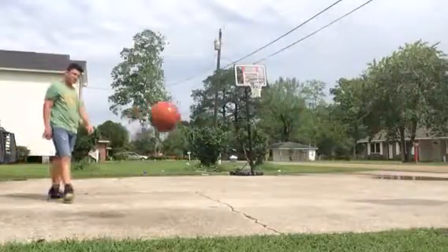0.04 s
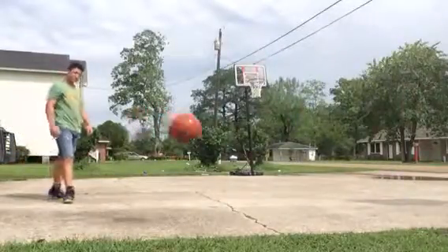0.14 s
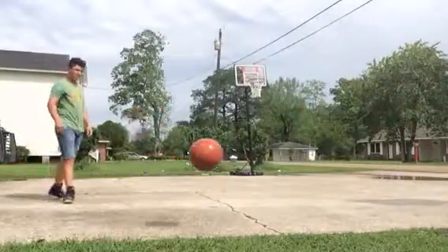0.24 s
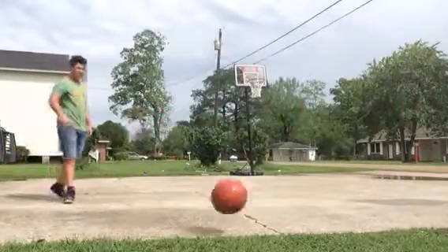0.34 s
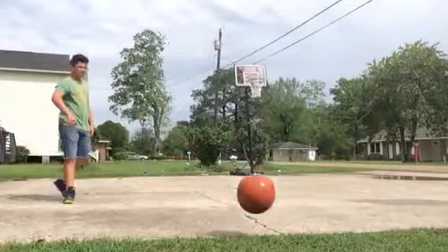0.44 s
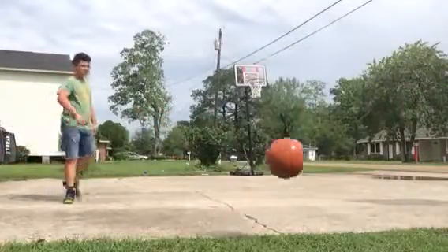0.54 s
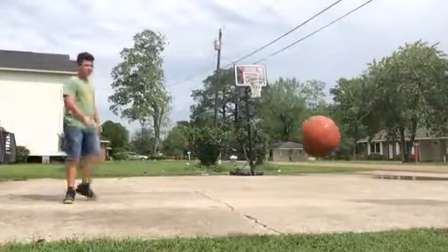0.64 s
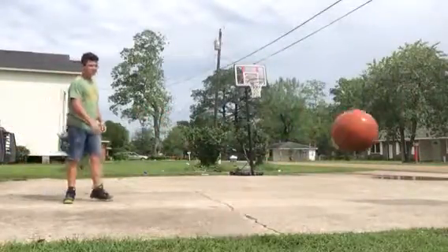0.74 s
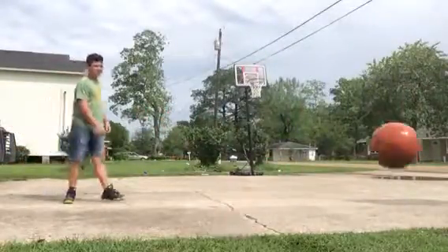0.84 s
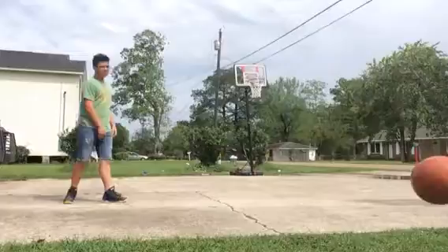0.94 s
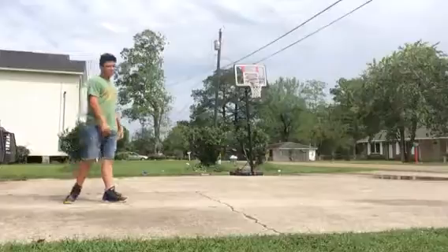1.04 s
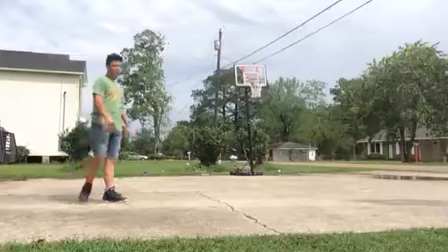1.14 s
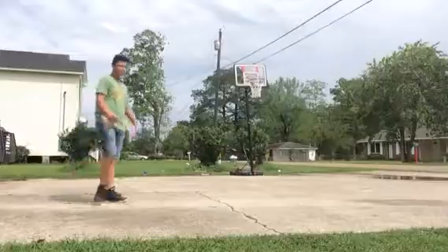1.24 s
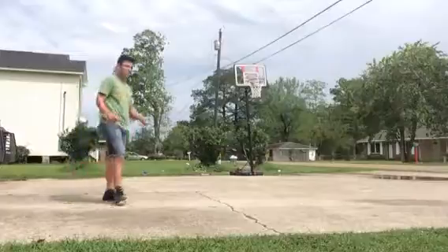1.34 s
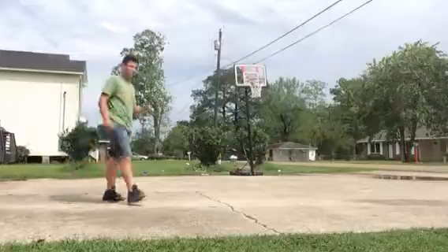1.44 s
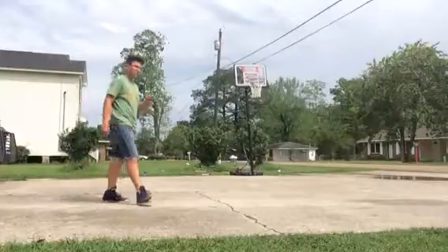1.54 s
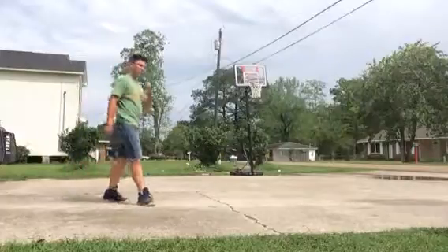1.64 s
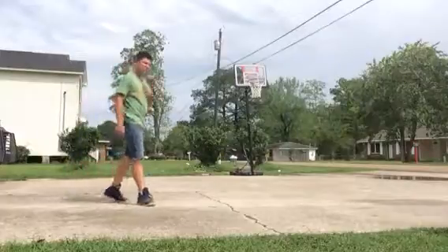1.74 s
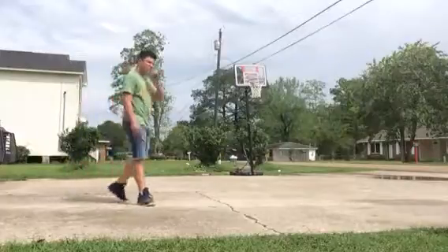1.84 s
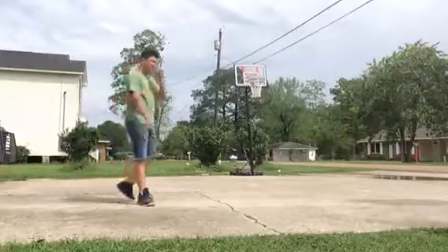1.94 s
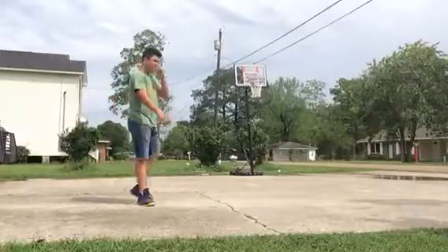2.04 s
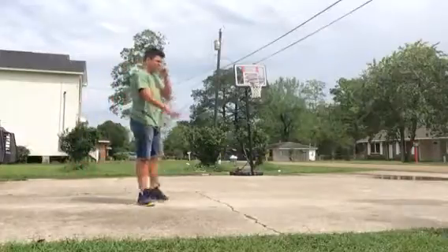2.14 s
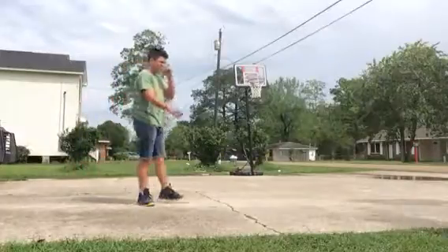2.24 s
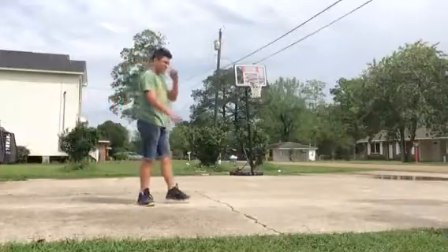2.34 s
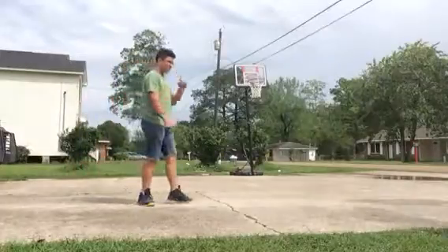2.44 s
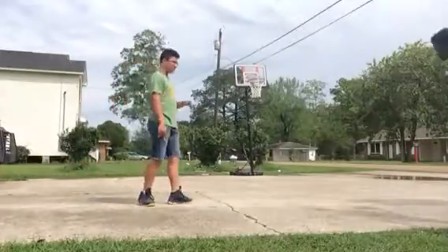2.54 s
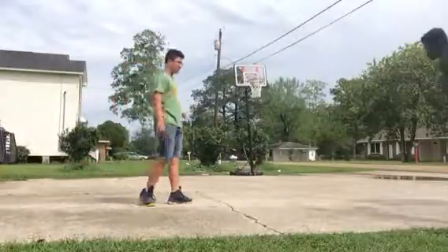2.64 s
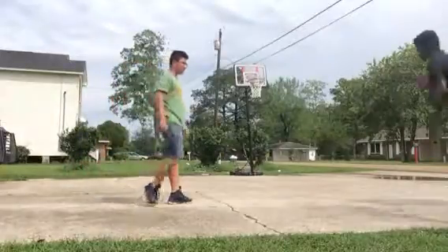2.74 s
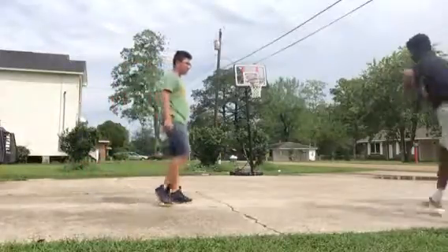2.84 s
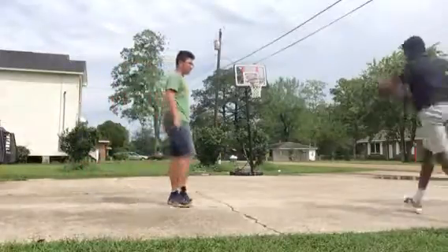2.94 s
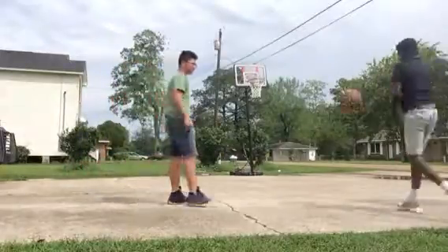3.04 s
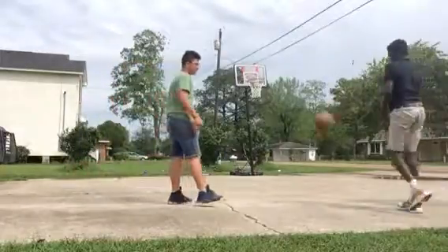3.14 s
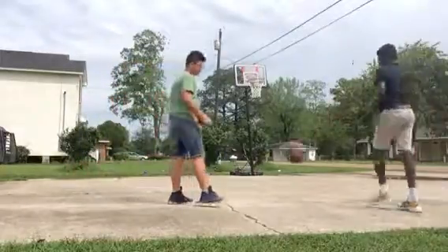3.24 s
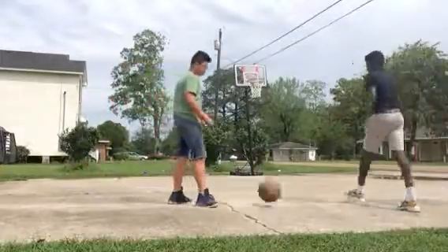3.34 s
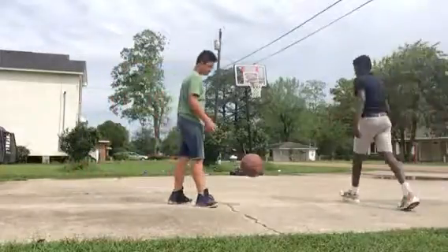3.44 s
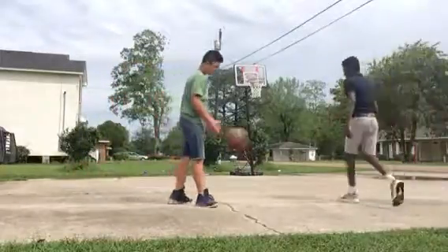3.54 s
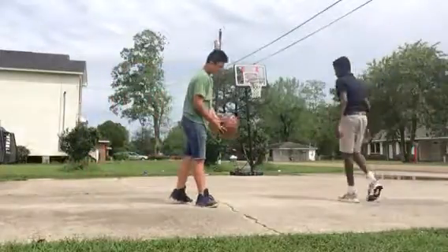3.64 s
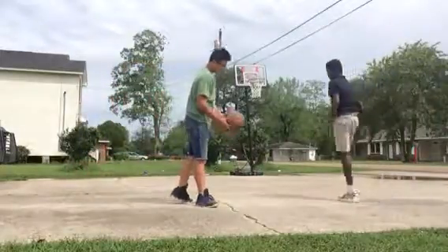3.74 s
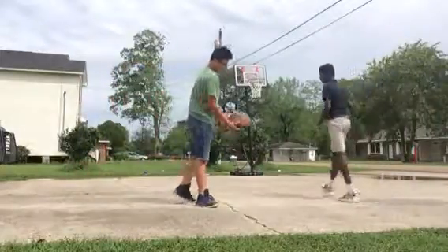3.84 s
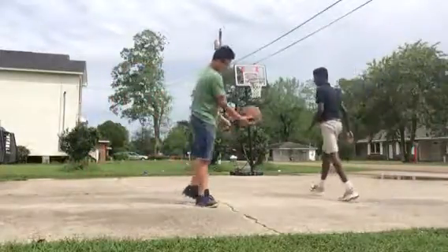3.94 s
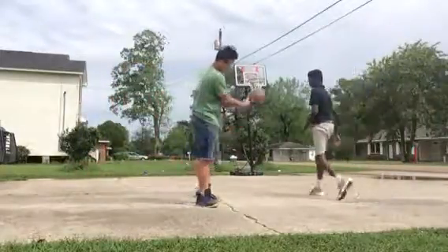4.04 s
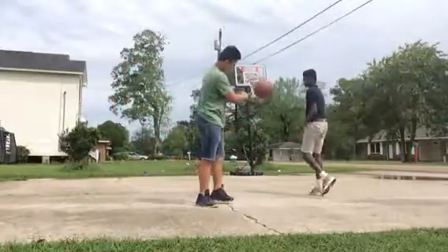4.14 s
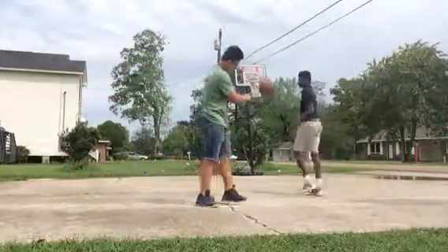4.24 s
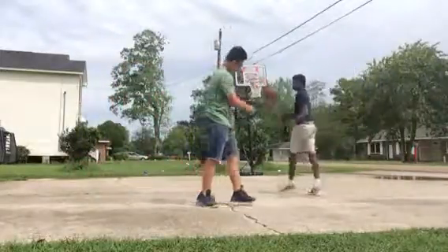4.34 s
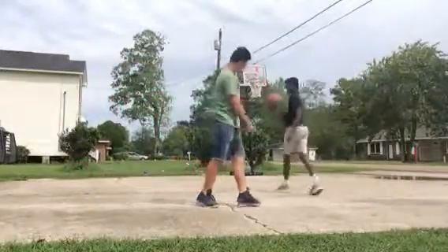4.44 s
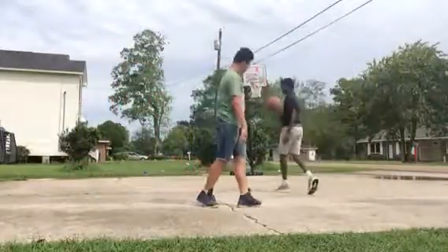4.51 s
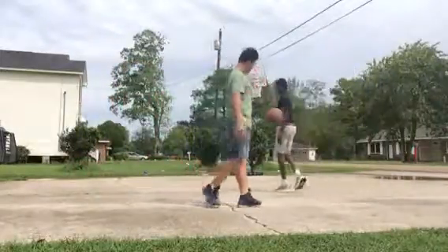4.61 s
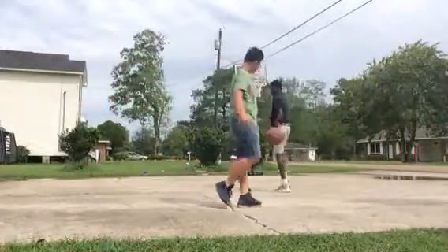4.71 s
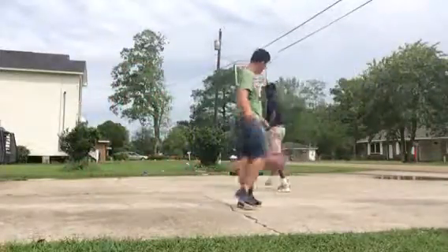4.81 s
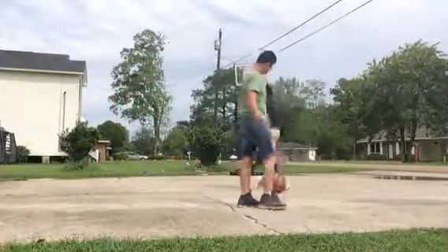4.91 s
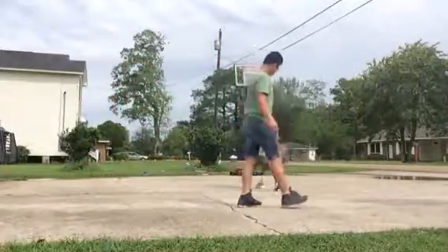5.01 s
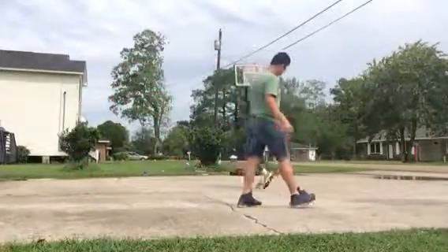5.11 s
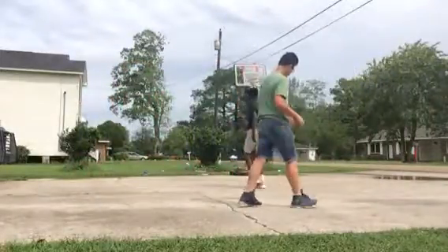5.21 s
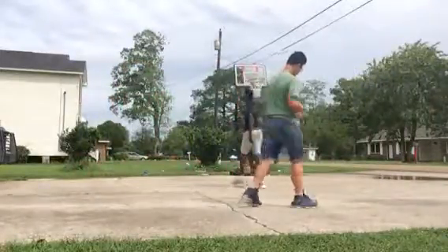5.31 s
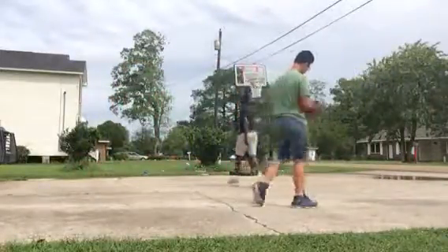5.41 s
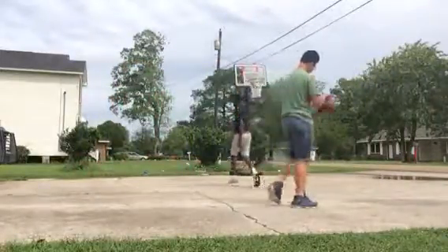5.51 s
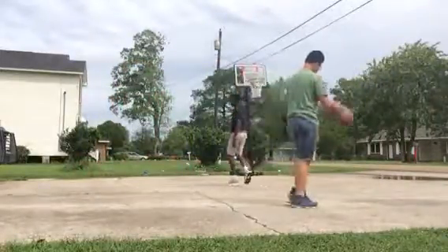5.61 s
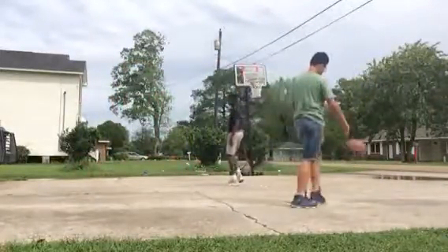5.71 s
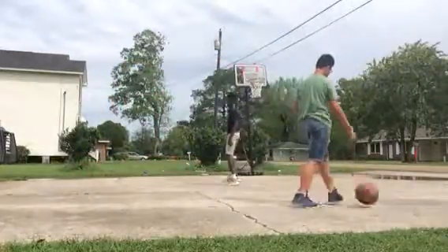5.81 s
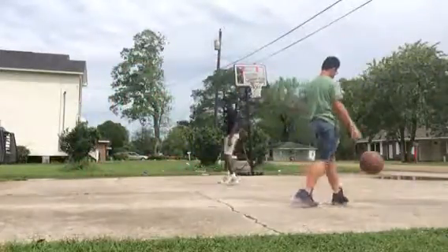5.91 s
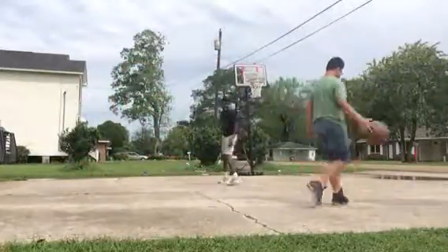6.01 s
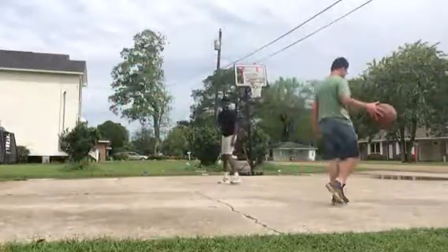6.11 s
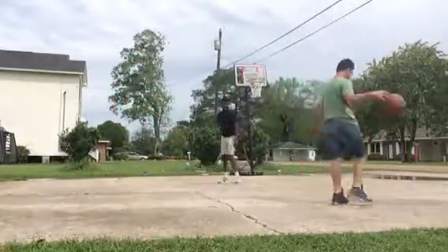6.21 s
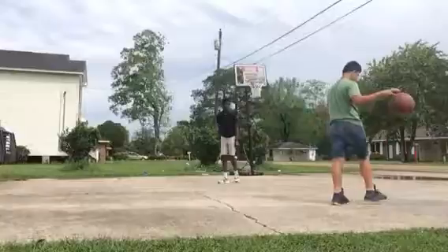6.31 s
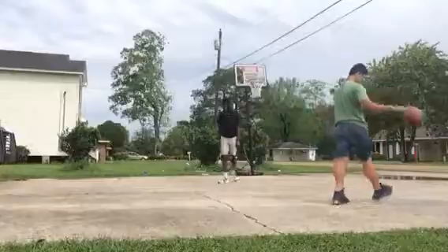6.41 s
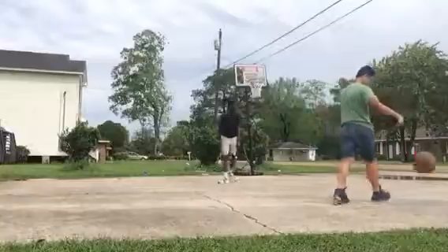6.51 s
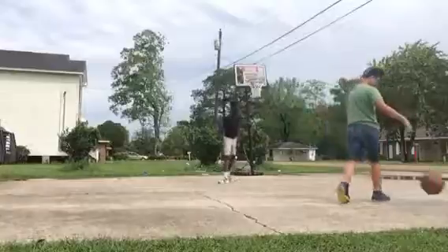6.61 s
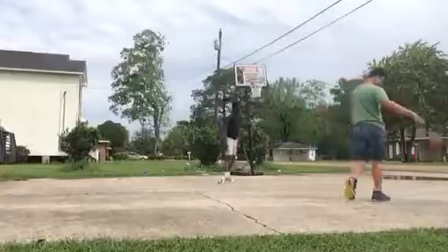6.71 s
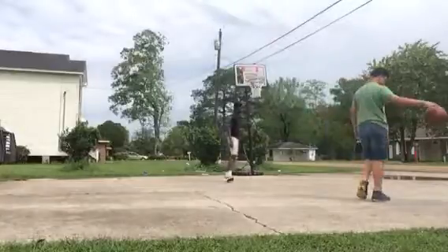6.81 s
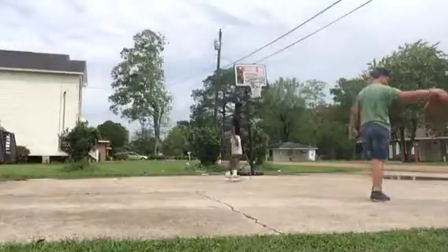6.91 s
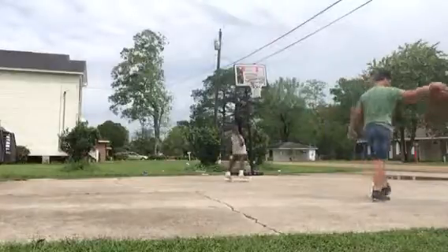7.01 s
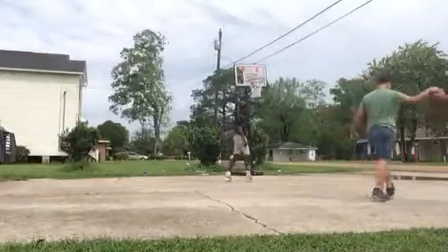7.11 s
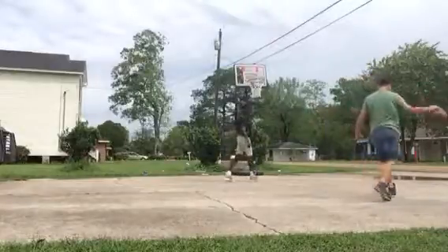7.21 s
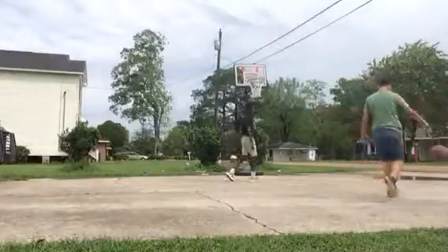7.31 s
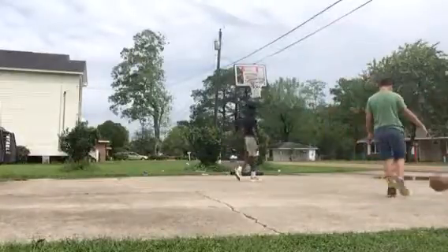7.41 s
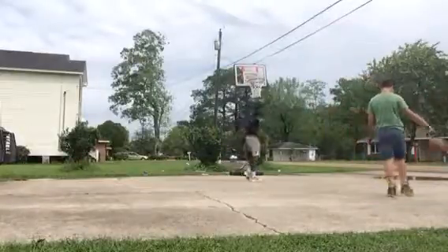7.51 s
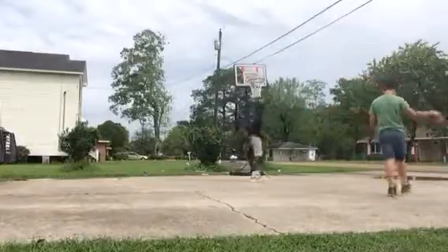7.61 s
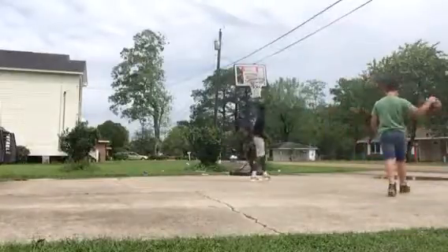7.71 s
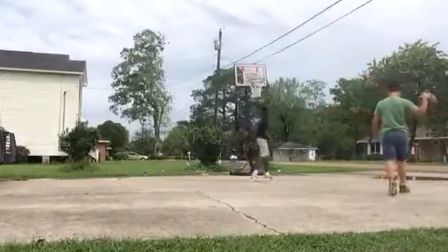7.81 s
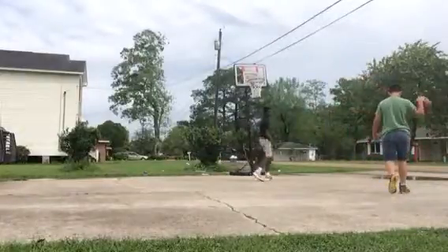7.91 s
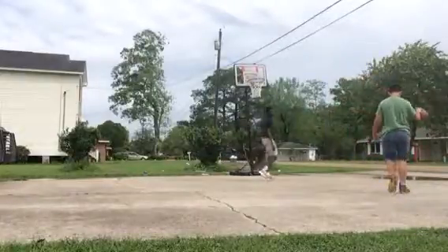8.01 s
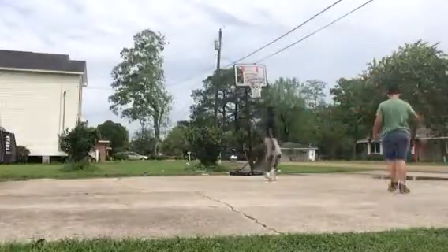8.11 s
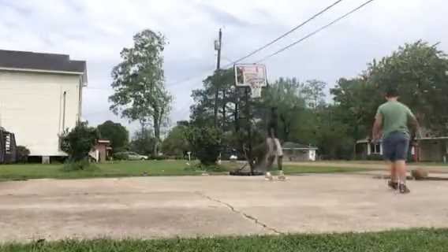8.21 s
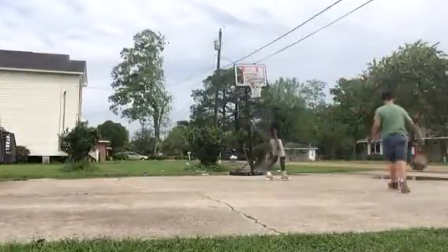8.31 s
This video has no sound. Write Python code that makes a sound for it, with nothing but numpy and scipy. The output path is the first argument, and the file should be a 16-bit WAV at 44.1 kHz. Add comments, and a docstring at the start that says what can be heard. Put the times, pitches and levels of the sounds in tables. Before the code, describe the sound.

Single ball bounces, then a steady slow dribble on a hard open court, with shoes scuffing sand, birds chirping and distant rumble behind.

```python
"""Two basketballs are bounced, caught and dribbled on outdoor concrete while two players shuffle about.
Each blow is a low push of air, a wobble of the shell, a slap and the ping of the air inside.
A near wall and a far house answer; shoes crunch and drag on loose sand, and a sole squeaks once.
Small birds whistle and chip in the trees over a low, distant hum, a rustle and microphone hiss.
Solids are damped modes and dying noise, birds are gliding sines, and the background is coloured noise."""
import sys
import numpy as np
from scipy import signal
from scipy.fft import rfft, irfft, next_fast_len
from scipy.io import wavfile
from scipy.ndimage import map_coordinates

SR = 44100
rng = np.random.default_rng(int(sys.argv[2]) if len(sys.argv) > 2 else 0)


def dump(signal):
    """Clip the signal to [-1, 1] and save it as 16-bit WAV at the path in sys.argv[1]."""
    limited = np.clip(np.atleast_2d(signal).T, -1, 1)
    pcm = np.round(limited * 32767).astype(np.int16)
    wavfile.write(sys.argv[1], SR, pcm)


N = 368235  # samples

# sand crushed on concrete or dust on a palm: (frequency [Hz], relative level [dB])
GRIT_SPECTRUM = [(300, 21.5), (1200, 4), (2500, 9), (4500, 0.5), (6800, 8), (9500, 1.5), (15000, -4)]
# sand under a sole: (frequency [Hz], relative level [dB])
CRUNCH_SPECTRUM = [(300, -18), (1200, 0), (2600, 5.5), (4000, 8), (5500, 8.5), (8000, 0), (15000, -4.5)]
WALL_DELAY_S = 0.011  # near wall, from mid-court


def amp(db):
    """Decibels to gain."""
    return 10 ** (np.asarray(db) / 20)


def unit(x):
    """Scale to rms 1."""
    return x / np.sqrt(np.mean(x ** 2) + 1e-20)


def along(points, hz):
    """Interpolate (Hz, value) points on a log frequency axis."""
    f, v = np.transpose(points)
    return np.interp(np.log(hz + 1), np.log(f + 1), v)


def filtered(x, response):
    """Multiply the spectrum of x by a function of frequency."""
    m = next_fast_len(len(x) + 8192)
    hz = np.fft.rfftfreq(m, 1 / SR)
    return irfft(rfft(x, m) * response(hz), m)[:len(x)]


def equalized(x, points):
    """Filter x by a (Hz, dB) curve."""
    return filtered(x, lambda hz: amp(along(points, hz)))


def noise(spectrum, size, shift=1):
    """Coloured noise of rms 1, its spectrum scaled in frequency by shift."""
    white = rng.standard_normal(size)
    return unit(filtered(white, lambda hz: amp(along(spectrum, hz / shift))))


def fade(t, t60):
    """Exponential decay, 60 dB in t60 seconds."""
    return np.exp(-np.log(1000) * t / t60)


def burst(spectrum, t, t60, shift=1):
    """Dying noise whose energy is set by its decay alone."""
    shape = fade(t, t60)
    return unit(noise(spectrum, len(t), shift) * shape) * np.sqrt(np.mean(shape ** 2))


def ring(modes, t, scatter_db, detune, tilt_db=0):
    """Damped modes, struck a little differently each time; tilt (dB an octave) favours the upper ones."""
    centre_hz = np.mean([hz for hz, _, _ in modes])
    out = np.zeros(len(t))
    for hz, db, t60 in modes:
        gain = amp(db + tilt_db * np.log2(hz / centre_hz) + scatter_db * rng.normal())
        mode_hz = hz * (1 + detune * rng.normal())
        out += gain * fade(t, t60) * np.sin(2 * np.pi * mode_hz * t)
    return out


def wobble(rate, size):
    """A smooth random curve, rate knots a second."""
    knots = rng.standard_normal(int(size * rate / SR) + 4)
    return map_coordinates(knots, [np.arange(size) * rate / SR])


def lobe(t, length):
    """Half a sine wave that starts at t = 0."""
    return np.sin(np.pi * np.clip(t / length, 0, 1))


def add(track, s, x):
    """Mix x into the track at time s."""
    part = track[max(round(s * SR), 0):][:len(x)]
    part += x[:len(part)]


def chirp(length, start_hz, end_hz):
    """A gliding whistle that flutters in pitch and strength; its last 7 % is silent."""
    u = np.linspace(0, 1, int(length * SR))
    pitch_hz = (start_hz + (end_hz - start_hz) * u) * (1 + 0.0098 * wobble(252.4, len(u)))
    flutter = unit(amp(5.4 * wobble(76.6, len(u))))
    envelope = np.abs(lobe(u, 0.93)) ** 0.28
    return flutter * envelope * np.sin(2 * np.pi * np.cumsum(pitch_hz) / SR)


def crackle(size, rate, spread_db):
    """Separate sand grains snapping, rate a second, of uneven size; rms 1."""
    hits = rng.random(size) < rate / SR
    sizes = amp(spread_db * rng.standard_normal(size))
    return unit(equalized(hits * rng.choice([-1, 1], size) * sizes, CRUNCH_SPECTRUM))


def scattered(x, decay):
    """x through a fresh diffuse tail with (Hz, t60 s) decay; scatter returns in uneven clumps."""
    patchy_db, patches_per_s = 2, 120
    hz, t, z = signal.stft(rng.standard_normal(SR), SR, nperseg=256)
    tail = signal.istft(z * fade(t, along(decay, hz)[:, None]), SR, nperseg=256)[1]
    tail *= amp(patchy_db * wobble(patches_per_s, len(tail)))
    return signal.fftconvolve(x, tail / np.linalg.norm(tail))[:len(x)]


def court(x, wall_s):
    """Direct sound, the near wall's copy, scatter from the yard and trees, and the house's dull echo."""
    # scatter of the yard: (frequency [Hz], t60 [s])
    yard_decay = [(100, 0.19), (400, 0.086), (1400, 0.13), (4000, 0.17), (12000, 0.094)]
    out = x.copy()
    add(out, wall_s, equalized(x, [(100, -9.5), (1300, -5), (4000, -8.0), (12000, -16.5)]))
    diffuse = equalized(x, [(100, -11.5), (400, 5.5), (1400, 0.5), (10000, -5)])
    add(out, 0.006, amp(-7.0) * scattered(diffuse, yard_decay))
    add(out, 0.04, amp(-24.5) * scattered(diffuse, [(400, 1.0), (1400, 0.98), (10000, 1.0)]))
    add(out, 0.155, equalized(x, [(90, -29.5), (260, -24), (480, -44), (5000, -58)]))
    return out


def blow(t, push_db, contact, shell_db, tilt_db, slap_db, slap_hz, damping=1):
    """The ball flattens and pushes air; its skin slaps, its shell wobbles and the air inside pings."""
    # rubber wall: (nominal frequency [Hz], relative level [dB], undamped-by-hand t60 [s])
    shell_modes = [(185, -3, 0.049), (264, -8.5, 0.046), (327.4, 2, 0.056), (428, 1.5, 0.13),
                   (471.5, 1.5, 0.064)]
    # air inside the ball: (nominal frequency [Hz], relative level [dB], t60 [s])
    cavity_modes = [(940, -29, 0.056), (1071, -13, 0.048), (1170, -28, 0.032), (1306, -11, 0.021),
                    (1478, -21.5, 0.055), (1570, -18.5, 0.034), (1676, -27, .065), (2835, -38, 0.14),
                    (3330, -35, 0.071)]
    # skin on the ground, before its pitch shift: (frequency [Hz], relative level [dB])
    slap_spectrum = [(200, -19.5), (450, -10), (640, -13), (820, -8), (1000, -4), (1300, 4.5), (1600, -5),
                     (1900, -13), (2700, -16.5), (5000, -75), (12000, -90)]
    cavity_tilt_db = 14  # per octave of mode, for each octave the slap is higher

    squeeze = lobe(t, contact)
    rebound = lobe(t - contact, 0.736 * contact)
    push = squeeze - 1.44 * rebound
    damped_modes = [(hz, db, t60 / damping) for hz, db, t60 in shell_modes]
    shell = ring(damped_modes, t, scatter_db=3.5, detune=0.031, tilt_db=tilt_db)
    slap_ratio = slap_hz / 1300
    skin = burst(slap_spectrum, t, t60=0.024, shift=slap_ratio)
    ping_tilt_db = cavity_tilt_db * np.log2(slap_ratio)
    ping = ring(cavity_modes, t, scatter_db=2.5, detune=0.018, tilt_db=ping_tilt_db)
    onset = 1 - np.exp(-t / 0.00026)  # the contact patch takes a moment to spread
    return amp(push_db) * push + amp(shell_db - 6.5) * shell + amp(slap_db) * (skin + ping) * onset


def bounces():
    """Concrete adds a sharp crack and crushed sand to the blow; weaker bounces stay down longer."""
    # ball on concrete, levels relative: (time [s], push [dB], shell [dB], shell tilt [dB/octave],
    # slap [dB], slap pitch [Hz], crack [dB], grit [dB], wall delay [s])
    bounce_table = [(0.4752, -17.5, -27, 4, -17.5, 1247, -34.5, -42, .0085),
                    (1.1484, -27.5, -37, 9.5, -31.5, 1380, -57, -30, .0098),
                    (3.4535, -16, -26, 1, -17.5, 1257, -18.5, -37, .0108),
                    (4.985, -13.5, -23, -11, -19.5, 1127, -23, -40, .0101),
                    (5.9181, -15, -20.5, -6, -16.5, 1237, -21.5, -27.5, .009),
                    (6.6799, -13.5, -25, -8.5, -12, 1540, -32, -26, .0125),
                    (7.496, -15, -19.5, -12, -16, 1172, -25.5, -30.5, .0112),
                    (8.349, -22, -31, -5.5, -17, 1120, -32, -33, .01)]
    # crack of the impact, before its pitch shift: (frequency [Hz], relative level [dB])
    crack_spectrum = [(500, -43), (1500, -46), (2200, 23.5), (2700, -19.5), (4200, 15), (5300, 1),
                      (6700, 6.5), (9000, -10), (15000, -34)]
    firm_contact_s, firm_db, contact_law = 0.003946, -14, 0.34
    crack_law = 1.39  # crack pitch rises as this power of slap pitch

    out, t = np.zeros(N), np.arange(int(0.8 * SR)) / SR
    for s, push_db, shell_db, tilt_db, slap_db, slap_hz, crack_db, grit_db, wall_s in bounce_table:
        contact = firm_contact_s * amp(firm_db - push_db) ** contact_law
        x = blow(t, push_db, contact, shell_db, tilt_db, slap_db, slap_hz)
        x += amp(crack_db + 2.5) * burst(crack_spectrum, t, t60=0.011, shift=(slap_hz / 1300) ** crack_law)
        crushed = fade(t, 0.008) + 0.3 * fade(t, 0.05)
        crushed *= 1 - np.exp(-t / 0.00021)  # most sand gives way just after first touch
        x += amp(grit_db + 8.5) * crushed * noise(GRIT_SPECTRUM, len(t))
        add(out, s, court(x, wall_s))
    return out


def catches():
    """Hands take the ball with a short, damped knock and a brush of dusty skin."""
    # ball into hands, levels relative: (time [s], push [dB], contact [s], shell [dB],
    # shell tilt [dB/octave], slap [dB], slap pitch [Hz])
    catch_table = [(.237, -56, .0015, -51.5, 14, -70, 1300), (.986, -36, .0016, -52, -14, -43, 755),
                   (3.7253, -30.5, 0.00265, -41, 17.5, -36, 1420),
                   (4.522, -41, 0.0018, -28.5, -11, -28, 1420)]
    hand_damping = 1.37  # palms stop the shell this many times faster

    out, t = np.zeros(N), np.arange(SR // 2) / SR
    for s, push_db, contact, shell_db, tilt_db, slap_db, slap_hz in catch_table:
        x = blow(t, push_db, contact, shell_db, tilt_db, slap_db, slap_hz, hand_damping)
        x += amp(push_db - 11.5) * burst(GRIT_SPECTRUM, t, t60=0.034)
        add(out, s, court(x, WALL_DELAY_S))
    return out


def steps():
    """Soles land with a gritty tick; the heavier the heel, the duller the crunch."""
    # shoes land: (time [s], relative crunch level [dB], crunch t60 [s], heel trim on crunch level [dB])
    step_table = [(0.184, -50.5, 0.05, -12), (0.4438, -43, 0.013, -8), (1.289, -48, 0.06, -6),
                  (1.5369, -36, 0.03, -3), (1.792, -40.5, 0.039, -1.5), (2.497, -55.5, 0.081, 6.5),
                  (2.533, -46.5, 0.048, -4.5), (2.805, -50.5, 0.0059, -5), (3.168, -58, 0.014, 3),
                  (4.618, -35.5, 0.012, -13.5), (5.411, -49, .023, -22), (5.79, -51, 0.021, -0.5),
                  (6.052, -47.5, 0.025, -8), (6.572, -48.5, 0.015, -9), (6.636, -33, 0.0048, -27),
                  (6.654, -41.5, 0.016, -11), (7.31, -53, 0.1, -27)]
    crunch_centre_hz, heel_db_per_octave = 3880, 37
    heel_spectrum = [(100, -32), (350, 11.5), (600, -6.5), (1200, -2), (2200, 3.0), (6000, -37.0)]  # Hz, dB

    out, t = np.zeros(N), np.arange(SR // 2) / SR
    for s, db, t60, heel_db in step_table:
        crunch_hz = crunch_centre_hz * 2 ** (-heel_db / heel_db_per_octave)
        giving = unit(amp(0.53 * wobble(620, len(t))))
        giving *= 1 - np.exp(-t / (0.083 * t60))  # grains give way as weight comes on
        crunch = giving * burst(CRUNCH_SPECTRUM, t, t60, shift=crunch_hz / 4000)
        heel = burst(heel_spectrum, t, t60=0.044)
        add(out, s, court(amp(db + 3.5) * crunch + amp(db + heel_db) * heel, WALL_DELAY_S))
    return out


def scuffs():
    """Soles slide: sand hisses and crackles while the rubber drags."""
    # slides: (time [s], length [s], relative sand level [dB], relative rubber level [dB])
    scuff_table = [(0.304, .18, -65, -76), (0.786, 0.22, -64.5, -63.5), (1.585, 0.23, -67.5, -65),
                   (1.757, 0.24, -60, -64), (2.09, 0.18, -65.5, -67), (2.437, 0.21, -64, -60),
                   (4.436, 0.069, -55.5, -44.5), (4.461, .18, -61, -67), (5.231, 0.29, -61.5, -70),
                   (5.75, 0.069, -61.5, -60), (5.967, 0.24, -62, -57), (6.758, .096, -54.5, -62),
                   (6.923, 0.037, -68, -53.5), (7.248, .16, -65.5, -63), (7.774, 0.21, -66, -73)]
    rubber_hz = 1310  # pitch of the drag
    sand_spectrum = [(500, -14), (2000, 9.5), (4000, -2.5), (6500, 6.5), (9000, -3.0), (15000, -16)]  # Hz, dB
    rubber_spectrum = [(150, 2), (550, -4.5), (1200, 2.5), (2000, -5.5), (6000, -28)]  # Hz, dB

    out = np.zeros(N)
    for s, length, sand_db, rubber_db in scuff_table:
        u = np.linspace(0, 1, int(length * SR))
        roughness = amp(3 * wobble(900, len(u)) + 2.9 * wobble(70, len(u)))
        hiss = unit(noise(sand_spectrum, len(u)) * roughness)
        grains = amp(-1.5) * hiss + amp(-5.5) * crackle(len(u), rate=300, spread_db=3.5)
        drag = noise(rubber_spectrum, len(u), shift=rubber_hz / 1200)
        add(out, s, lobe(u ** 0.53, 1) * (amp(sand_db) * grains + amp(rubber_db) * drag))
    return out


def grain_ticks():
    """Single grains snap under shifting feet."""
    return amp(-83) * crackle(N, rate=34, spread_db=4)


def squeak():
    """A rubber sole grips and slips in one short rising note with its third harmonic."""
    out = np.zeros(N)
    note, overtone = chirp(0.024, 560, 1000), chirp(0.024, 1680, 3000)
    add(out, 2.492, note + amp(-4) * overtone)
    return amp(-49) * out


def birds(count=130):
    """Near whistles, chips and thin high notes over a far chorus that arrives only as scatter from the trees."""
    # nearly level whistles: (time [s], length [s], start pitch [Hz], relative level [dB])
    whistles = [(0, 0.041, 3650, -67), (0.529, .15, 3200, -70.5), (1.247, 0.2, 4190, -72.5),
                (2.073, 0.061, 2700, -68), (2.694, 0.082, 3295, -68.5), (2.892, 0.056, 3430, -72.5),
                (2.932, 0.051, 4290, -66.5), (3.066, 0.076, 4330, -65.5), (3.17, .13, 4286, -65),
                (3.325, 0.2, 4370, -71), (3.949, 0.042, 2735, -58.5), (4.067, 0.034, 2530, -64),
                (4.854, 0.034, 2220, -67), (5.194, 0.058, 3090, -65.5), (6.102, 0.11, 2974, -60),
                (6.207, 0.19, 2960, -74), (6.84, 0.088, 3590, -67), (8.045, 0.022, 3660, -56)]
    # short falling chips: (time [s], start pitch [Hz], relative level [dB])
    chips = [(3.166, 4100, -65), (3.64, 3980, -65), (3.8, 4020, -63), (4.255, 3160, -66),
             (4.4, 3900, -69.5), (4.665, 3110, -62.5), (4.804, 3940, -64.5), (5.115, 2990, -62),
             (6.942, 3000, -60.5), (7.73, 3070, -66)]
    # thin high notes that creep upward, one sounding an octave above the whistle just before it: (time [s],
    # length [s], start pitch [Hz], relative level [dB])
    thin_notes = [(.275, 0.17, 6130, -71), (0.86, 0.066, 5650, -71), (0.918, 0.045, 5900, -64),
                  (1.206, 0.19, 7360, -76), (2.234, 0.11, 5620, -74.5), (2.756, 0.2, 6670, -72.5),
                  (2.925, 0.21, 7250, -74.5), (3.859, 0.18, 6180, -73), (5.094, .05, 7050, -71),
                  (7.08, 0.29, 6160, -75.5)]
    whistle_rise, chip_fall = 1.004, 0.88  # end pitch over start pitch
    chip_s, thin_rise_hz_per_s = 0.0278, 1700

    near, far = np.zeros(N), np.zeros(N)
    for s, length, hz, db in whistles:
        add(near, s, amp(db) * chirp(length, hz, hz * whistle_rise))
    for s, hz, db in chips:
        add(near, s, amp(db) * chirp(chip_s, hz, hz * chip_fall))
    for s, length, hz, db in thin_notes:
        add(near, s, amp(db) * chirp(length, hz, hz + thin_rise_hz_per_s * length))
    for when, span, height, glide, strength in rng.random((count, 5)):
        hz = 2200 + 2100 * height
        call = chirp(0.017 + 0.03 * span, hz, hz * (1.04 - 0.135 * glide))
        add(far, when * N / SR, amp(-71.5 + 1.7 * strength) * call)
    return amp(5.5) * near + amp(-1.5) * scattered(near + far, [(2000, 0.73), (9000, 1.0)])


def rumble():
    """Distant outdoor rumble: coloured noise whose level drifts."""
    # outdoor background: (frequency [Hz], relative level [dB])
    air_spectrum = [(15, -27), (25, 0), (72, 1), (130, -5.5), (153, -4.5), (190, -9.5), (373, -20),
                    (439, -21), (2350, -35), (2690, -54), (4250, -43), (4870, -48), (6920, -40),
                    (14800, -63.5), (16000, -72)]
    return amp(-50.5 + wobble(2.79, N)) * noise(air_spectrum, N)


def hum():
    """A distant low sine that wavers in pitch and strength."""
    pitch_hz = 97 * (1 + 0.0147 * wobble(11, N))
    return amp(-62 + 5.3 * wobble(3.7, N)) * np.sin(2 * np.pi * np.cumsum(pitch_hz) / SR)


def rustle():
    """Faint leaf noise, uneven on slow, middling and fast time scales."""
    leaves = noise([(500, -30), (1400, 9.0), (4000, -2.0), (9000, -21.0), (15000, -14.5)], N)
    stir_db = 1.9 * wobble(6.8, N) + 3.8 * wobble(45, N) + 1.6 * wobble(500, N)
    return amp(-67.5) * unit(leaves * amp(stir_db))


def microphone_hiss():
    """Steady high-frequency noise of the microphone."""
    # microphone hiss: (frequency [Hz], relative level [dB])
    hiss_spectrum = [(5000, -30), (7500, 16), (9500, 20.5), (10200, 12.5), (11000, -21)]
    return amp(-75.5) * noise(hiss_spectrum, N)


def scene():
    """Everything at one microphone."""
    balls = bounces() + catches()
    shoes = steps() + scuffs() + grain_ticks() + squeak()
    background = rumble() + hum() + rustle() + microphone_hiss()
    return (balls + shoes + birds() + background)[None]


def record(dry):
    """The microphone sheds the deepest bass and keeps nothing above its band limit."""
    top_hz = 15500
    low_cut = signal.butter(2, 50, "highpass", fs=SR, output="sos")
    deep = [(25, -8), (38, -7.5), (50, -4.5), (62, -2), (80, 0)]  # Hz, dB
    x = signal.sosfilt(low_cut, dry[0])
    return filtered(x, lambda hz: amp(along(deep, hz)) * (hz < top_hz))[None]


dry = scene()
out = record(dry)
dump(out)
```